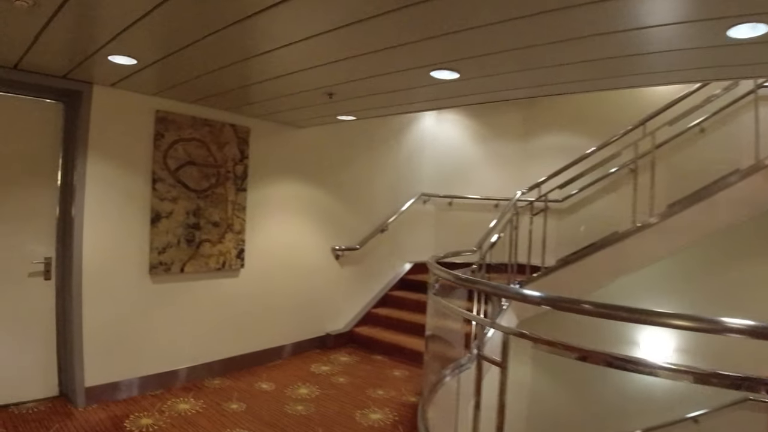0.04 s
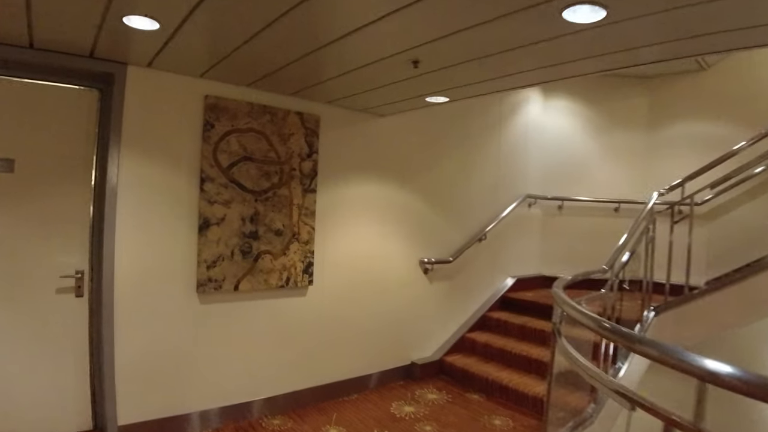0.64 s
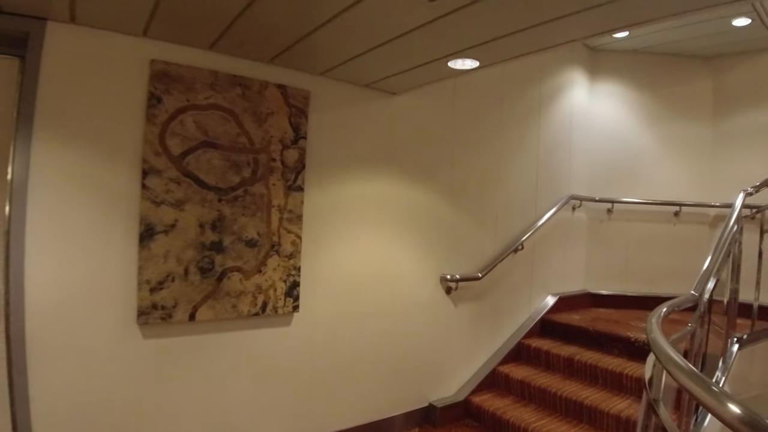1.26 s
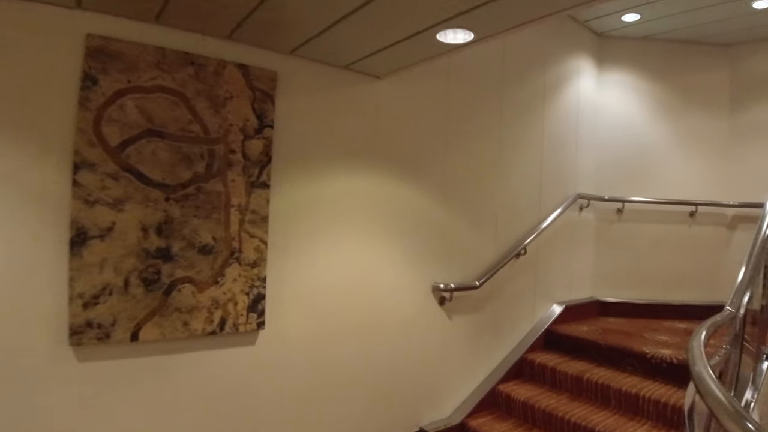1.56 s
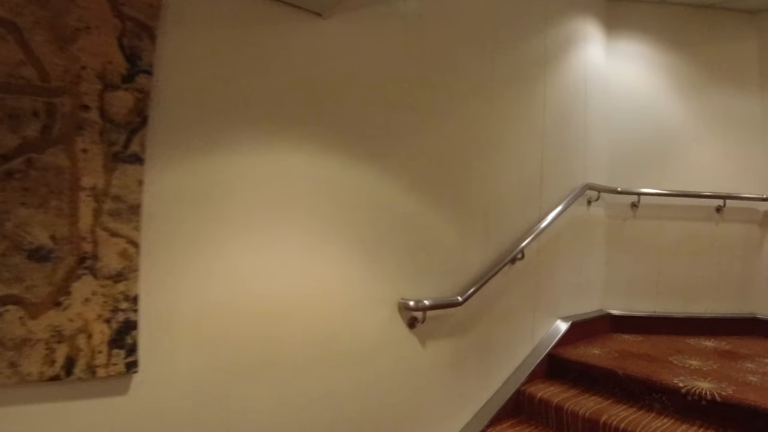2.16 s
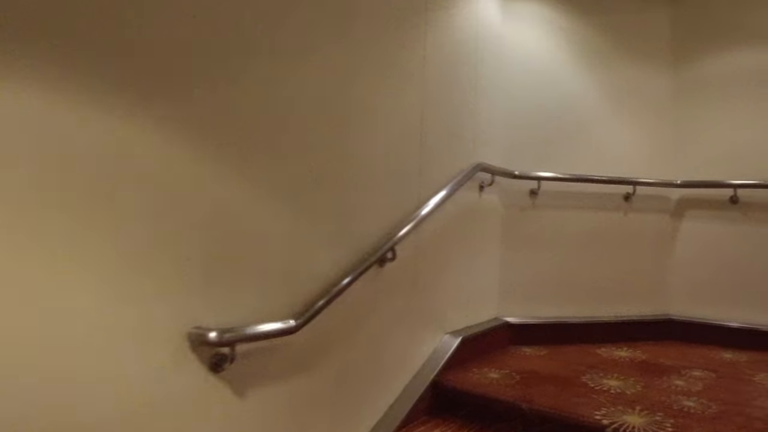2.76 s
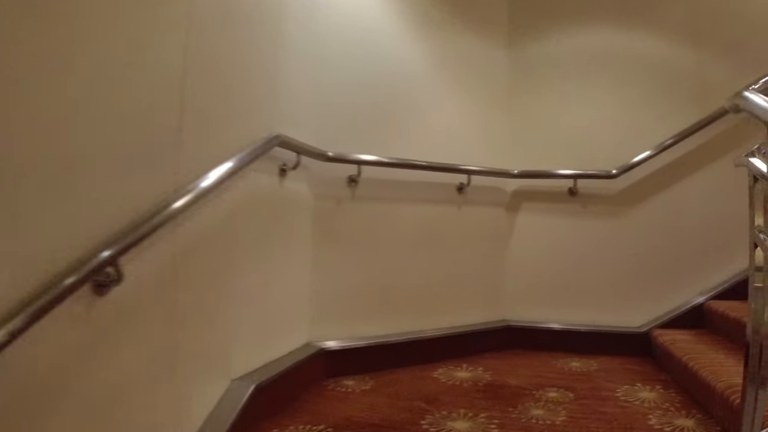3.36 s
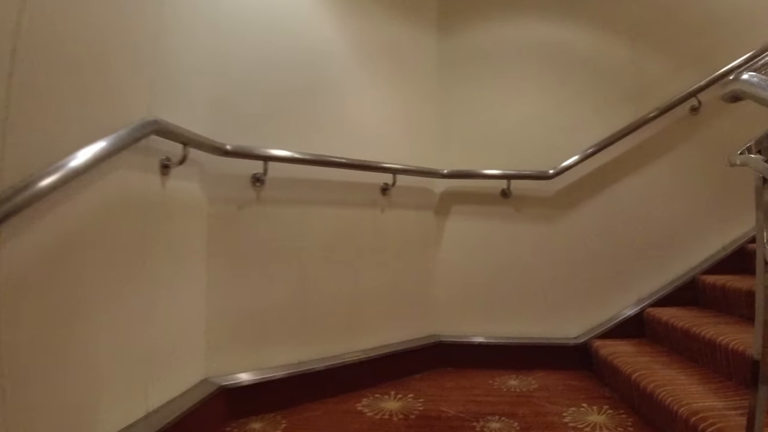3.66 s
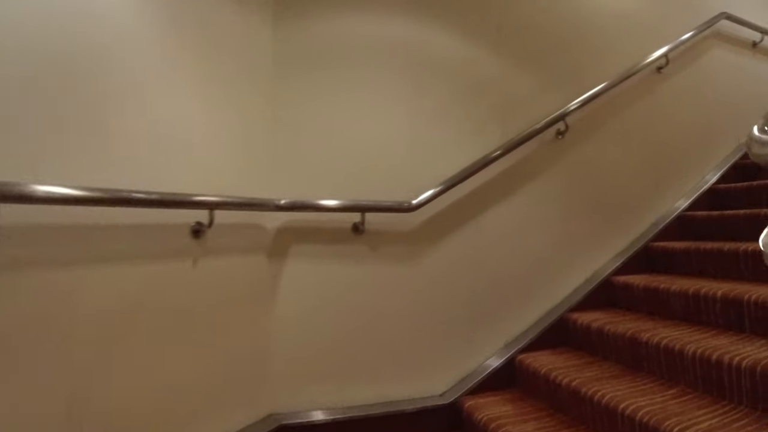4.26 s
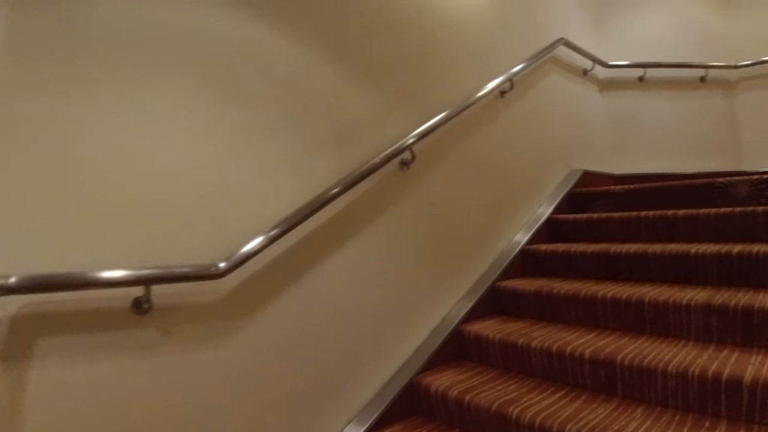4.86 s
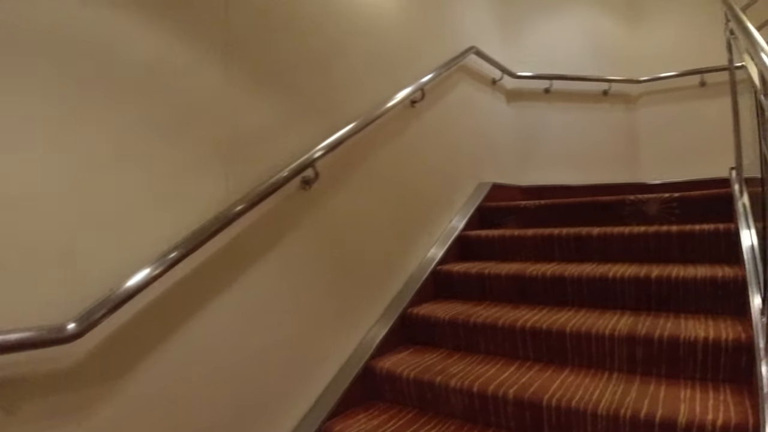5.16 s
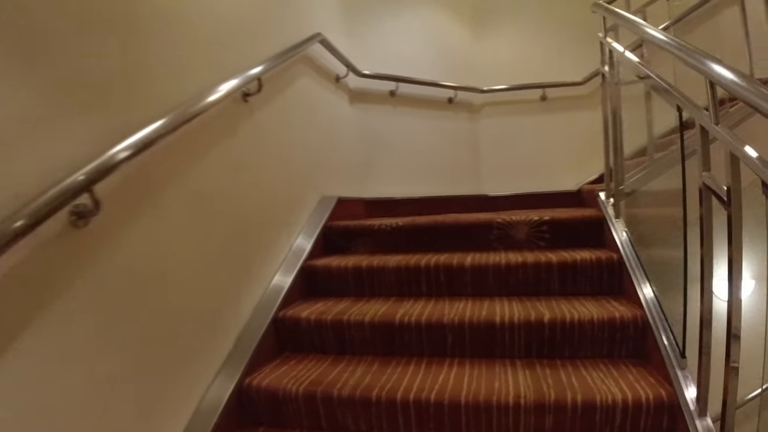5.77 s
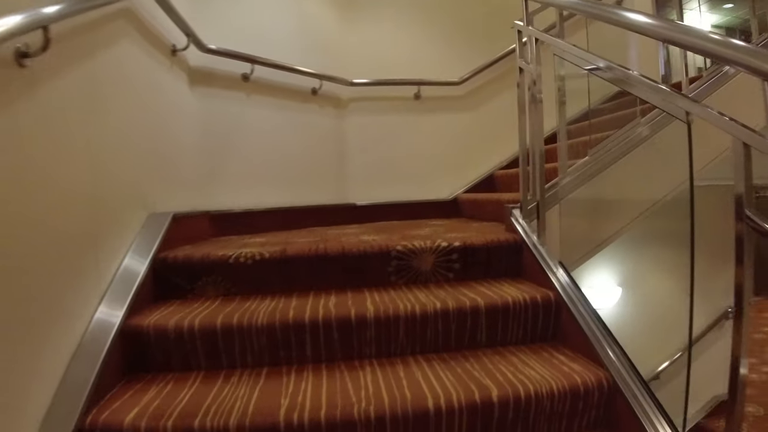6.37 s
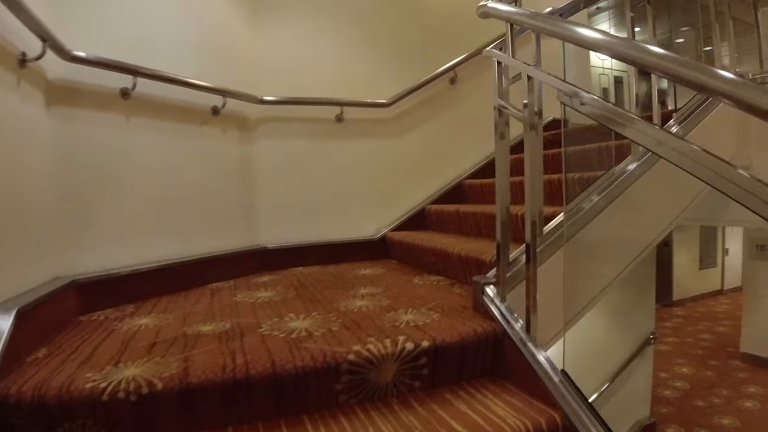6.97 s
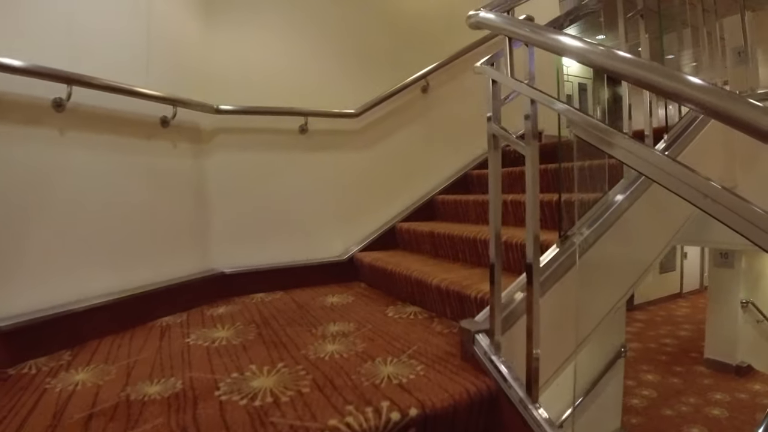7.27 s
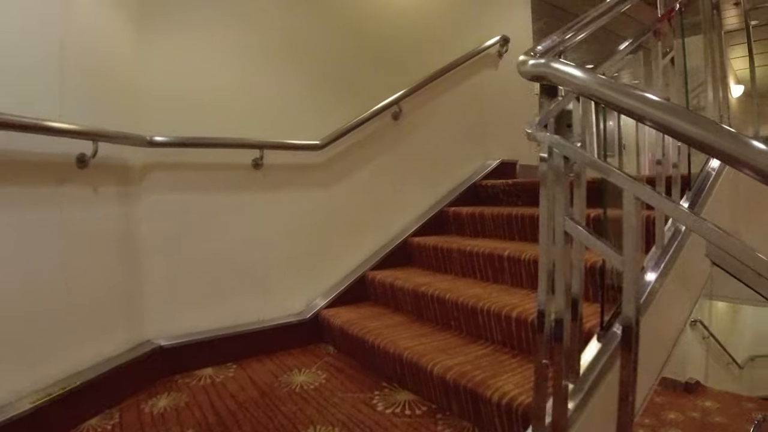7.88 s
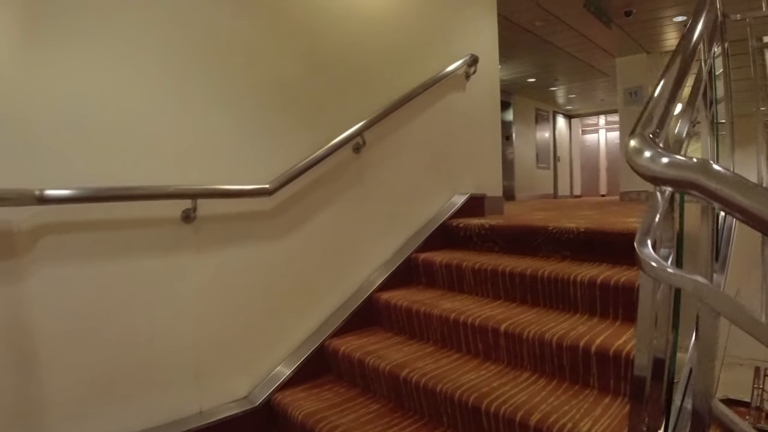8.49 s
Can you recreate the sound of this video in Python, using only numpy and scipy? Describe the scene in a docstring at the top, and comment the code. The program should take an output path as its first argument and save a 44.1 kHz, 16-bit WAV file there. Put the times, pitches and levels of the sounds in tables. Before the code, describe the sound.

Dull, thudding steps go up a carpeted ship stairway, mixed with hollow handling noise and a steady deep engine drone.

```python
"""Footsteps cross a ship's landing and climb carpeted stairs, about 2.4 steps a second.
Each footfall is a muffled heel knock, a thud of the tread, a boom of the deck and a scuff on the pile.
The walker carries a small camera: the hand rubs and taps its case, and it judders at times.
Clothes rustle, faint whines and squeaks come and go; machinery rumbles and vents hiss throughout."""
import sys
import numpy as np
from scipy import signal
from scipy.fft import rfft, irfft, next_fast_len
from scipy.io import wavfile
from scipy.ndimage import uniform_filter1d

SR = 44100
rng = np.random.default_rng(int(sys.argv[2]) if len(sys.argv) > 2 else 0)


def bounce(signal):
    """Save signal as a 16-bit WAV file at the path given by the first command-line argument."""
    frames = np.transpose(np.atleast_2d(signal))
    limited = np.clip(frames, -1, 1)
    pcm = np.round(limited * 32767).astype(np.int16)
    wavfile.write(sys.argv[1], SR, pcm)


N = 384993
T = np.arange(N) / SR


def from_db(db):
    """Decibels to gain."""
    return 10 ** (np.asarray(db) / 20)


def rms_one(x):
    """Scale to an rms of 1."""
    return x / np.sqrt(np.mean(x ** 2) + 1e-20)


def automation(rows):
    """A (t/s, value) curve at every sample."""
    return np.interp(T, *np.transpose(rows))


def at_hz(points, hz):
    """An (f/Hz, value) curve read on a log-frequency axis."""
    knots, values = np.transpose(points)
    return np.interp(np.log(hz + 1e-6), np.log(knots), values)


def cut(x, hz, kind, order=2):
    """Butterworth filter."""
    return signal.sosfilt(signal.butter(order, hz, kind, fs=SR, output="sos"), x + 1e-18)


def drift(rate_hz):
    """Smooth random modulation with an rms of 1."""
    hop, run_in = 40, 2000
    knots = cut(rng.standard_normal(N // hop + run_in + 2), hop * rate_hz, "low")[run_in:]
    return np.interp(np.arange(N) / hop, np.arange(len(knots)), rms_one(knots))


def resonate(x, hz, width):
    """Two-pole resonance with a gain of 1 at its peak."""
    r = np.exp(-np.pi * width / SR)
    poles = [1, -2 * r * np.cos(2 * np.pi * hz / SR), r * r]
    return signal.lfilter((1 - r * r) / 2 * np.array([1, 0, -1]), poles, x + 1e-18)


def add(out, s, sound):
    """Mix a short sound in at time s."""
    start = max(round(s * SR), 0)
    part = out[..., start:start + sound.shape[-1]]
    part += sound[..., :part.shape[-1]]


def swell(rise_s, t60):
    """A one-second envelope: smooth attack to 1, exponential decay."""
    attack = np.sin(np.pi / 2 * np.clip(T[:SR] / rise_s, 0, 1)) ** 2
    return attack * np.exp(-np.log(1000) * np.maximum(T[:SR] - rise_s, 0) / t60)


def contact(rise_s, t60, tail_db, tail_t60):
    """One quick swell with the weaker tail of the stairwell."""
    return np.hypot(swell(rise_s, t60), from_db(tail_db) * swell(2 * rise_s, tail_t60))


def burst(s, db, **shape):
    """A contact envelope placed on the timeline."""
    out = np.zeros(N)
    add(out, s, from_db(db) * contact(**shape))
    return out


def held(s, length, attack_s, release_s):
    """Attack, hold, release: ramps centred on the start and the end of a gesture."""
    return np.clip(np.minimum((T - s) / attack_s, (s + length - T) / release_s) + .5, 0, 1)


# stereo image of diffuse sound: f/Hz, left-right correlation
CORRELATION = [(30, 0.91), (60, 0.98), (130, 0.64), (290, 0.16), (600, 0.041), (15000, 0.059)]
def noise(spectrum):
    """Coloured stereo noise, centred in the bass and wide above; rms 1."""
    size = next_fast_len(N)
    hz = np.arange(size // 2 + 1) * SR / size
    mid, side = rfft(rng.standard_normal((2, size)))
    alike = np.clip(at_hz(CORRELATION, hz), -1, 1)
    rolloff = 1 / (1 + (hz / spectrum[-1][0] / 2) ** 4)
    pair = np.sqrt(1 + alike) * mid + np.sqrt(1 - alike) * side * [[1], [-1]]
    return rms_one(irfft(pair * rolloff * from_db(at_hz(spectrum, hz)), size)[:, :N])


def near(pair, spread_db):
    """A source close in front has a narrow image: the side signal is turned down."""
    mid, side = (pair[0] + pair[1]) / 2, (pair[0] - pair[1]) / 2
    return rms_one(mid + from_db(spread_db) * side * [[1], [-1]])


def walls(x, echo_db):
    """The close, hard stairwell walls return early reflections, different left and right."""
    out = x.copy()
    for channel in range(2):
        for delay in rng.uniform(0.0048, 0.015, size=4):
            add(out[channel], delay, from_db(echo_db) * x[channel])
    return out


# colour of the rumble: f/Hz, relative level/dB
RUMBLE_SPECTRUM = [(12, -15), (26, 0), (33, -5), (44, 1.5), (62, -3), (85, -9), (120, -10.5), (150, -17.5),
                   (180, -10), (220, -16.5), (320, -21.5), (480, -25.5), (750, -26), (1100, -59)]
# rumble along the way: t/s, level/dB
RUMBLE_FADER = [(0, -38), (2.1, -40), (3.2, -39), (4.5, -39), (6.3, -38), (8.73, -44)]
# swells of hum: crest t/s, length/s, level/dB, f/Hz
MACHINE_SWELLS = [(0.5, 0.45, -43.5, 178.6), (1.13, 1, -57.5, 264), (2.67, 0.9, -45.5, 260.8),
                  (2.98, 1, -45, 121.3), (3.24, 0.3, -47, 180), (3.643, 0.58, -52, 264),
                  (4.627, 0.48, -41, 265.4), (5.84, 0.29, -54.5, 265.3), (6.38, 0.78, -45.5, 264.4),
                  (6.872, 0.35, -50.5, 264), (7.22, 0.35, -44.5, 266.6), (8.147, 0.49, -45.5, 265)]
def machinery(hum_hz=264, hum_db=-61, waver_hz=3, flutter_db=2):
    """A bed of deep rumble through the hull, with wavering hums that swell and sink."""
    waver, flutter = waver_hz * drift(25), from_db(flutter_db * drift(15))
    hum = lambda hz: flutter * np.sin(2 * np.pi * np.cumsum(hz + waver) / SR + np.array([[0], [.9]]))
    out = from_db(automation(RUMBLE_FADER)) * noise(RUMBLE_SPECTRUM) + from_db(hum_db) * hum(hum_hz)
    for s, length, db, hz in MACHINE_SWELLS:
        gain = np.zeros(N)
        add(gain, s - length / 2, from_db(db) * np.hanning(round(length * SR)))
        out += gain * hum(hz)
    return out


def engines(drone_hz=26.9, start_db=-44, waver_hz=0.55):
    """The engines drone through the hull in one sub-bass tone that rides the rumble's level."""
    along_db = automation(RUMBLE_FADER)
    phase = 2 * np.pi * np.cumsum(drone_hz + waver_hz * drift(2)) / SR
    return np.sqrt(2) * from_db(start_db + along_db - along_db[0]) * np.sin(phase)


# airflow, fading as the stairs lead away from the ceiling vents: t/s, relative level/dB
VENT_FADER = [(0, -63), (3.7, -62), (5.8, -67), (6.7, -65), (7.6, -68), (8.73, -67.5)]
# colour of the air: f/Hz, relative level/dB
AIR_SPECTRUM = [(600, -9.5), (1000, 1.5), (1500, -1.5), (2100, -6.5), (2800, -14), (4000, -18), (5600, -27),
                (7200, -32), (9000, -28.5)]
# duct resonances: f/Hz, width/Hz, relative level/dB
DUCT_MODES = [(1272, 115, 0.5), (1686, 240, -2.5), (1851, 91, -2), (2406, 280, -9.5), (4440, 380, -23.5)]
def ventilation():
    """Air hisses from the ceiling and sounds the ducts, each resonance wavering in level."""
    ducts = 0
    for hz, width, db in DUCT_MODES:
        tone = resonate(resonate(rng.standard_normal((2, N)), hz, width), hz, width)
        ducts += from_db(db + 1.5 * drift(5)) * tone
    air = rms_one(walls(noise(AIR_SPECTRUM), echo_db=-9))
    return from_db(automation(VENT_FADER)) * (from_db(-3) * air + from_db(-0.13) * rms_one(ducts))


# slides of the hand over the case, each with its own level and colour:
# t/s, length/s, level/dB, tilt/dB per octave, favoured f/Hz
HAND_SLIDES = [(0.0, 0.46, -45.5, 3, 735), (0.319, 0.39, -38.5, 2.5, 488), (0.693, 0.19, -43, 7, 486),
               (1.02, 0.51, -46, -7.5, 450), (1.697, 0.5, -44.5, -5.5, 520),
               (1.89, 0.083, -39.5, -7.5, 570), (3.598, 0.15, -38, -3.5, 570), (3.722, 0.14, -30.5, 1, 454),
               (3.763, 0.085, -36.5, 9, 755), (3.935, 0.35, -42.5, 11, 494), (4.439, 0.34, -38, 11, 430),
               (4.656, 0.071, -29, 2.5, 436), (4.707, 0.16, -31, 0.5, 436), (4.87, 0.59, -33, 9, 440),
               (5.207, 0.073, -25.5, 2, 466), (5.431, 0.73, -38.5, 2.5, 510.4), (5.788, 0.089, -33, 6, 597),
               (6.2, 0.32, -43.5, 2.5, 477), (6.592, 0.52, -43.5, 7.5, 508), (7.213, 0.16, -36.5, -2, 510),
               (7.333, 0.28, -45.5, 5, 517), (7.743, 0.11, -39, 2, 490), (8.023, 0.57, -39.5, 5, 488)]
# the skin catches and lets go at once: t/s, level/dB
SKIN_CATCHES = [(1.084, -35.5), (1.21, -37.5), (2.004, -40), (2.755, -35), (7.653, -41)]
def hand(case_hz, rest_db=-50, rest_tilt=-1, catch_tilt=-2.5, favour_db=5.5, favour_octaves=.17):
    """Gain and EQ (dB at each case_hz) of a hand that rests, slides, and catches at every footfall."""
    octaves = np.log2(case_hz / 441)   # tilts are in dB per octave about this pivot
    power = np.full(N, from_db(rest_db) ** 2)
    colour = rest_tilt * octaves * power
    for s, length, db, tilt, hz in HAND_SLIDES:
        slide = (from_db(db) * held(s, length, attack_s=0.032, release_s=0.13)) ** 2
        favour = np.exp(-(np.log2(case_hz / hz) / favour_octaves) ** 2)
        power += slide
        colour += (tilt * octaves + favour_db * favour) * slide
    catches, rise_s = np.zeros(N), 0.022
    jolts = [(s, jolt_db) for s, *_, jolt_db in FOOTFALLS]
    for s, db in SKIN_CATCHES + jolts:
        add(catches, s - rise_s, from_db(db) * swell(rise_s, t60=0.36))
    strength = np.hypot(np.sqrt(power) * from_db(1.2 * drift(14)), catches)
    colour_db = (colour + catch_tilt * octaves * catches ** 2) / (power + catches ** 2)
    return strength, colour_db


# resonances of the camera case: f/Hz, width/Hz, relative level/dB
CASE_MODES = [(146, 75, -16), (343, 80, -13.5), (436.3, 39.3, 2), (516.7, 41.3, -0.5), (557, 66, -5.5),
              (727.3, 34, -4), (789, 85, -15.5)]
def case_rubbing():
    """Handling noise: dense little slips of skin ring the case; each microphone hears its own patch."""
    slips = rng.standard_normal((2, N)) * from_db(drift(70))
    strength, colour_db = hand(np.array(CASE_MODES)[:, :1])
    case = 0
    for k, (hz, width, db) in enumerate(CASE_MODES):
        gain = from_db(db + colour_db[k] + 2.38 * drift(5.46))
        case += (-1) ** k * gain * resonate(slips, hz, width)
    case = cut(cut(case, 846, "low", order=12), 110, "high")   # soft skin carries no treble
    # levelled, so that the hand's pressure sets the dynamics
    case /= np.sqrt(uniform_filter1d(np.mean(case ** 2, axis=0), size=SR // 20))
    return from_db(-0.44) * strength * case


# rustle, busiest in the first strides: t/s, relative level/dB
RUSTLE_FADER = [(0, -73.5), (1.0, -77), (1.7, -84.5), (2.6, -77.5), (8.73, -81)]
# swishes of a sleeve or trouser leg: t/s, length/s, level/dB
LIMB_SWISHES = [(.08, 0.37, -79), (.40, 0.16, -72), (1.385, 0.051, -72), (1.545, .06, -70),
                (2.42, 0.17, -75), (4.24, 0.14, -72), (4.76, 0.18, -76.5), (5.52, 0.12, -75),
                (6.8, 0.21, -87)]
# colour of sliding fabric: f/Hz, relative level/dB
FABRIC_SPECTRUM = [(1000, -5), (2600, 0.5), (3300, -4), (4200, -5), (5200, -9.5), (6300, -17),
                   (7400, -29.5), (10500, -21), (15000, -25)]
def clothes():
    """Fabric slides in small uneven catches and swishes as a limb swings."""
    slide = from_db(automation(RUSTLE_FADER) + 3)
    for s, length, db in LIMB_SWISHES:
        add(slide, s, from_db(db) * np.hanning(round(length * SR)))
    return slide * from_db(1.5 * drift(40)) * rms_one(walls(noise(FABRIC_SPECTRUM), echo_db=-6))


# a sole drags over the carpet: t/s, length/s, level/dB, centre f/Hz
SOLE_DRAGS = [(.42, 0.22, -69.5, 2750), (0.722, 0.11, -77, 2700), (0.892, .14, -72, 2920),
              (4.773, 0.029, -66, 3650), (4.778, 0.11, -68, 2170), (5.526, .1, -68.5, 2700),
              (5.572, 0.11, -76, 3500), (6.044, .05, -69, 2400)]
def sole_scrapes(width_hz=1200):
    """Pile flicks past the sole in uneven grains."""
    out = np.zeros((2, N))
    for s, length, db, hz in SOLE_DRAGS:
        size = round(length * SR)
        flicks = rng.standard_normal((2, size)) * from_db(1.3 * drift(90)[:size])
        rasp = rms_one(resonate(resonate(flicks, hz, width_hz), hz, width_hz))
        add(out, s, from_db(db) * np.hanning(size) * rasp)
    return out


# soft steps, brushes, a sole settling: t/s, rise/s, relative rasp/dB, relative bump/dB, bump f/Hz
LIGHT_CONTACTS = [(0.7781, 0.02, -73, -32, 119), (1.86, 0.058, -91, -31.5, 152),
                  (2.48, 0.02, -88, -35, 107), (2.75, 0.021, -65, -42, 112), (3.2275, .022, -74, -41, 180),
                  (3.8405, 0.017, -77, -45, 113), (4.275, 0.019, -71, -45, 113),
                  (7.614, 0.0089, -74, -40, 326), (7.995, 0.01, -72, -38.5, 304)]
# colour of the deck under a foot: f/Hz, relative level/dB
DECK_SPECTRUM = [(45, -1), (80, 1.5), (125, 0.5), (175, -6), (235, -14.5), (310, -7.5), (420, -11.5),
                 (600, -31.5)]
def soft_steps(bump_width_hz=37):
    """A light foot makes a short rasp of pile over a soft, ringing bump of the deck."""
    rasp, bumps = np.zeros(N), np.zeros((2, N))
    deck = near(noise(DECK_SPECTRUM), spread_db=-6)
    for s, rise_s, rasp_db, bump_db, hz in LIGHT_CONTACTS:
        add(rasp, s - .012, from_db(rasp_db + 8) * swell(rise_s, t60=0.19))
        start = min(round(s * SR), N - SR)
        ring = rms_one(resonate(deck[:, start:start + SR], hz, bump_width_hz))
        add(bumps, s, from_db(bump_db - 3.5) * swell(rise_s, t60=0.36) * ring)
    return cut(rasp * noise(FABRIC_SPECTRUM), 4800, "low") * from_db(2.4 * drift(150)) + bumps


# bouts of camera shake: t/s, length/s, level/dB, f/Hz
SHAKES = [(1.065, 0.15, -41.5, 36.1), (3.634, 0.051, -31, 34.55), (3.734, 0.1, -26, 41.1),
          (3.88, 0.044, -25, 42), (4.443, 0.46, -25, 40.18), (4.905, 0.43, -29.5, 40.7),
          (5.351, 0.053, -24.5, 38.03), (5.776, 0.25, -31, 42.6), (6.784, .18, -28.5, 33),
          (7.217, 0.11, -28, 29.75), (7.547, 0.1, -28, 36.3), (8.01, 0.19, -28, 28.1),
          (8.36, 0.042, -33, 37.9)]
def judder():
    """The camera shakes on its mount when the arm is jolted: a nearly pure, very low throb."""
    rate = automation([(s + length / 2, hz) for s, length, _, hz in SHAKES])
    phase = 2 * np.pi * np.cumsum(rate + 2 * drift(9.6)) / SR
    shaking = sum(from_db(db) * held(s, length, attack_s=0.089, release_s=0.06)
                  for s, length, db, _ in SHAKES)
    return shaking * from_db(2.3 * drift(14)) * np.sqrt(2) * np.sin(phase)


def clothing_tick():
    """Something in the clothes gives one tiny, sharp tick."""
    envelope = burst(s=1.5015, db=-53, rise_s=0.0005, t60=.014, tail_db=-13, tail_t60=0.2)
    return envelope * noise(SCUFF_SPECTRUM)


# faint high whines and short squeaks: t/s, length/s, start f/Hz, end f/Hz, level/dB, waver/Hz
THIN_WHINES_AND_SQUEAKS = [(1.502, 0.8, 4420, 4460, -87, 68), (3.074, 0.4, 1980, 1890, -63.5, 8),
                           (4.77, .032, 1860, 2020, -58, 60), (4.788, .028, 2320, 2440, -62, 60),
                           (4.8, .18, 6500, 6430, -87, 30), (4.935, 0.037, 1325, 1360, -59.5, 15),
                           (6.89, 0.072, 5300, 5180, -76, 34), (6.93, .13, 5250, 5215, -84, 41)]
def whines_and_squeaks():
    """Thin, unsteady whistles that glide as they fade in and out."""
    out = np.zeros((2, N))
    for s, length, start_hz, end_hz, db, waver_hz in THIN_WHINES_AND_SQUEAKS:
        size = round(length * SR)
        hz = np.linspace(start_hz, end_hz, size) + waver_hz * drift(150)[:size]
        phase = 2 * np.pi * (np.cumsum(hz) / SR + np.array([[0], [1 / 8]]))
        envelope = from_db(db + 2.2 * drift(35)[:size]) * np.sqrt(np.hanning(size))
        add(out, s, envelope * np.sin(phase))
    return out


def strike(modes, rise_s):
    """A blow sets the modes ringing, a little differently on every hit and in each channel."""
    t, out = T[:SR // 2], 0
    for hz, db, t60 in modes:
        stereo_offset = 0.3 * rng.standard_normal((2, 1))
        detuned_hz = hz * (1 + .012 * rng.standard_normal())
        phase = 2 * np.pi * (detuned_hz * t + rng.random() + stereo_offset)
        gain = from_db(db + 0.5 * rng.standard_normal((2, 1)))
        out += gain * swell(rise_s, t60)[:len(t)] * np.sin(phase)
    return out


def tread(hz):
    """Weight comes onto a cushioned tread, which flexes in one low mode."""
    return swell(rise_s=0.016, t60=0.46) * np.sin(2 * np.pi * hz * T[:SR])


def tufts(per_s=420, decay_s=.002, spread_db=-1.5, smooth_bed=0.72):
    """Tufts of pile snap under a sole one by one: a spiky gain whose average power stays even."""
    snaps = (rng.random(N) < per_s / SR) * from_db(spread_db * np.minimum(rng.exponential(1, N), 3))
    gain = smooth_bed + signal.lfilter([1], [1, -np.exp(-1 / (decay_s * SR))], snaps + 1e-18)
    gain = uniform_filter1d(gain, size=24)
    return gain / np.sqrt(uniform_filter1d(gain ** 2, size=SR // 60))


# full steps, levels relative within each layer: t/s, heel knock/dB, edge slap/dB, scuff/dB,
# scuff cutoff f/Hz, tread thud/dB, tread f/Hz, deck boom/dB, jolt of the hand/dB
FOOTFALLS = [(3.885, -24, -76, -95, 5000, -33.5, 71.6, -33.5, -24),
             (4.35, -22.5, -74, -71.5, 3923, -34.5, 125.1, -27, -28),
             (4.766, -19, -59, -76.5, 5000, -47.5, 105.7, -32, -25.5),
             (6.294, -26, -65, -85, 4000, -38, 68, -44, -39.5),
             (6.762, -20.5, -40.5, -65.5, 5150, -25.5, 66.5, -29.5, -23.5),
             (7.169, -16, -49, -67, 4060, -25, 76.6, -30, -25.5),
             (7.563, -22.5, -47, -64, 5330, -24, 82.2, -33, -25.5),
             (7.987, -20, -54, -70, 4820, -30.5, 106.4, -28, -37),
             (8.389, -16, -54, -66, 5700, -33, 66.8, -25.5, -30.5)]
# ring of a heel blow: f/Hz, relative level/dB, t60/s
HEEL_RING = [(314, -12, 0.26), (428, -7, 0.12), (464, -18, 0.11), (516, -6.5, 0.15), (710.6, -5.5, 0.16),
             (710, -14, 0.44)]
# sharper ring of the heel's edge on the stair nosing: f/Hz, relative level/dB, t60/s
NOSING_RING = [(624, -7, 0.037), (965, 1, 0.047), (1118, -4.5, 0.11), (1286, -8, 0.053), (1420, -11, 0.062),
               (1800, -13.5, 0.19)]
# colour of a sole on the pile: f/Hz, relative level/dB
SCUFF_SPECTRUM = [(700, -1.5), (1500, 12.5), (2300, 6.5), (3000, 2), (3700, 2), (4700, -5.5), (5500, -14.5),
                  (6200, -21), (7500, -26), (10500, -14), (15000, -31.5)]
# resonances of the shoe: f/Hz, width/Hz, gain/dB
SHOE_MODES = [(1095, 40, 2), (2210, 50, -4), (2900, 70, -6), (3720, 70, -3)]
def footfalls():
    """The heel lands, the tread takes the weight, the deck booms and the sole flattens the pile."""
    knocks, slaps, scuff, boom = np.zeros((4, 2, N))
    pile = near(noise(SCUFF_SPECTRUM), spread_db=-4.5) * tufts()
    press = contact(rise_s=0.0086, t60=0.088, tail_db=-13, tail_t60=0.44)
    for s, heel_db, slap_db, scuff_db, cutoff_hz, thud_db, tread_hz, boom_db, _ in FOOTFALLS:
        add(knocks, s - .002, from_db(heel_db - 5.5) * strike(HEEL_RING, rise_s=0.0067))
        add(slaps, s - .001, from_db(slap_db + 5.5) * strike(NOSING_RING, rise_s=0.0014))
        add(knocks, s + 0.0061, from_db(thud_db + 3.5) * tread(tread_hz))
        patch = pile[:, round(s * SR) - SR:round(s * SR)]
        add(scuff, s, from_db(scuff_db + 10) * cut(press * patch, cutoff_hz, "low", order=4))
        boom += burst(s, boom_db + .5, rise_s=0.0096, t60=0.29, tail_db=-5, tail_t60=0.24)
    boom *= near(noise(DECK_SPECTRUM), spread_db=-10)
    shoe = sum(from_db(db) * resonate(scuff, hz, width) for hz, width, db in SHOE_MODES)
    return knocks + boom + walls(slaps, echo_db=-19.5) + from_db(3.5) * walls(scuff + shoe, echo_db=-6)


# a finger on the case: t/s, peak level/dB
FINGER_TAPS = [(4.352, -23), (4.386, -31), (4.799, -22), (6.295, -26.5), (7.789, -47), (7.992, -39),
               (8.044, -32)]
def finger_knocks(pitch_hz=540, width_hz=230):
    """A finger rings the case in short, dull taps."""
    tap = cut(resonate(signal.unit_impulse(SR), pitch_hz, width_hz), 665, "low", order=8)
    out = np.zeros(N)
    for s, db in FINGER_TAPS:
        add(out, s - .002, from_db(db) * tap / np.abs(tap).max())
    return out


# heel, then ball of the foot: t/s, relative click/dB, click cutoff f/Hz, pat delay/s, relative pat/dB
HEEL_AND_BALL = [(6.762, -34, 1610, 0.019, -51), (7.17, -38.5, 1700, 0.026, -44.5),
                 (7.565, -49, 2580, 0.021, -40), (7.988, -34.5, 1700, 0.024, -45),
                 (8.387, -41, 3800, 0.028, -49)]
# colour of click and pat: f/Hz, relative level/dB
CLICK_SPECTRUM = [(700, 2.5), (1100, 5), (1600, -5), (2300, -16), (3700, -22), (4800, -32), (6000, -48)]
def heel_clicks():
    """The heel's hard edge lands with a gritty click, then the ball of the foot pats down."""
    grit = from_db(1.8 * drift(300)) * near(noise(CLICK_SPECTRUM), spread_db=-13)
    out = np.zeros((2, N))
    for s, click_db, cutoff_hz, delay, pat_db in HEEL_AND_BALL:
        click = grit * burst(s - .001, click_db, rise_s=0.0011, t60=0.034, tail_db=-23, tail_t60=.1)
        pat = grit * burst(s + delay - .002, pat_db, rise_s=0.0018, t60=0.061, tail_db=-11, tail_t60=0.3)
        out += cut(cut(click, 440, "high"), cutoff_hz, "low", order=3)
        out += cut(pat, [400, 1900], "band")
    return walls(out, echo_db=-17)


def scene():
    """The stereo mix: feet, ship ambience, camera handling, clothes, whines and squeaks."""
    feet = footfalls() + heel_clicks() + soft_steps() + sole_scrapes()
    ambience = machinery() + engines() + ventilation()
    handling = case_rubbing() + finger_knocks() + judder()
    return feet + ambience + handling + clothing_tick() + clothes() + whines_and_squeaks()


# colour of the microphone hiss: f/Hz, relative level/dB
HISS_SPECTRUM = [(6500, -13.5), (8300, -15.5), (9900, 2), (10900, -1), (11700, -4), (12350, 4),
                 (13400, -13), (14050, -9), (15000, -5.5), (15700, -17)]
def record(dry):
    """The microphones add a faint high hiss that slowly sinks; a steep low-pass cuts the top."""
    hiss_db, fade_db_per_s = -81.5, 0.1
    hiss = from_db(hiss_db - fade_db_per_s * (T - T.mean())) * noise(HISS_SPECTRUM)
    return cut(dry + hiss, 15200, "low", order=20)


dry = scene()
out = record(dry)
bounce(out)
```